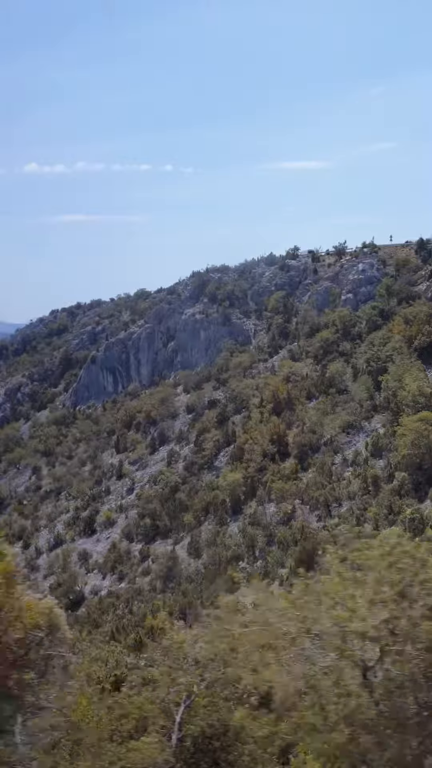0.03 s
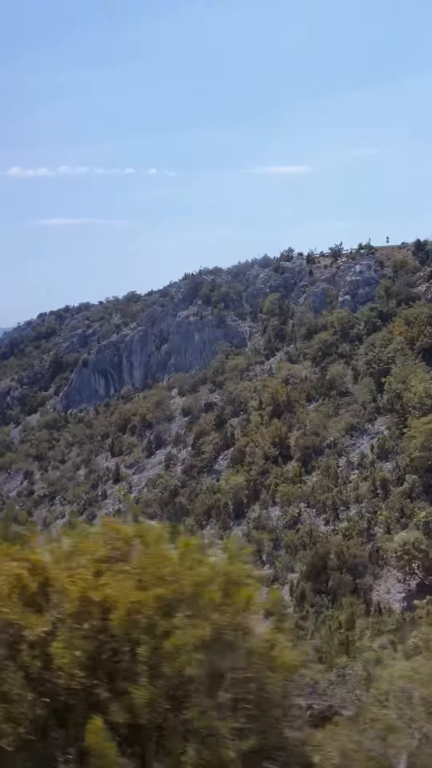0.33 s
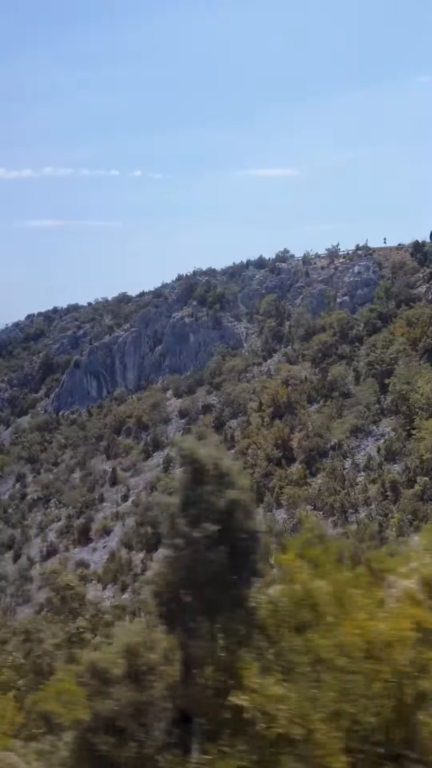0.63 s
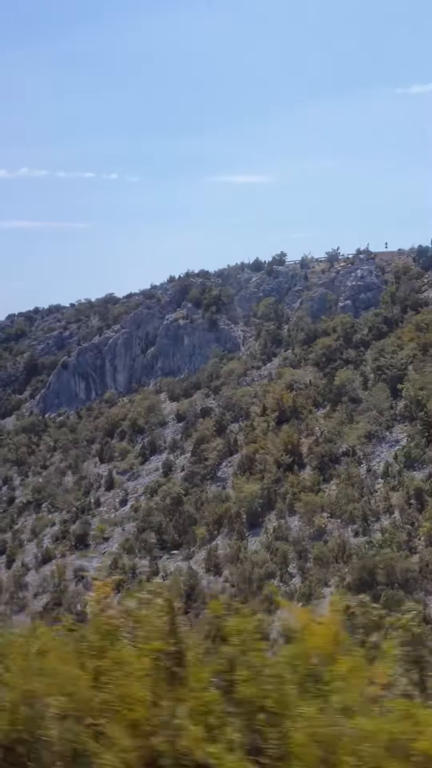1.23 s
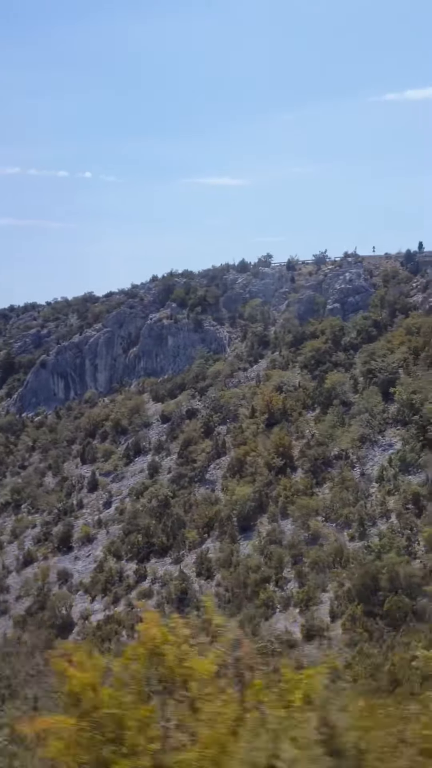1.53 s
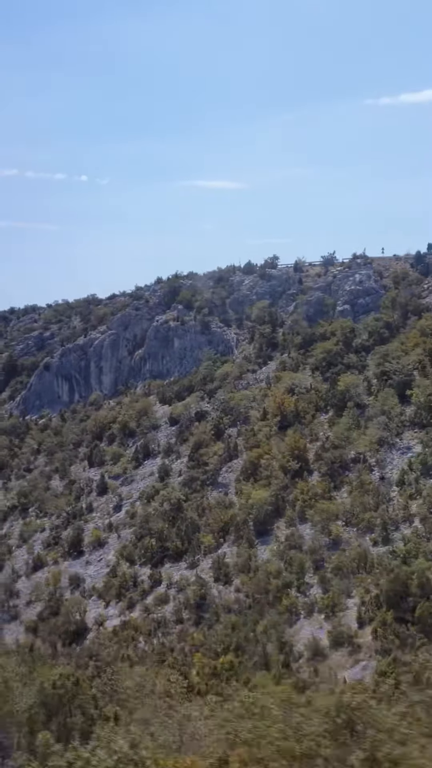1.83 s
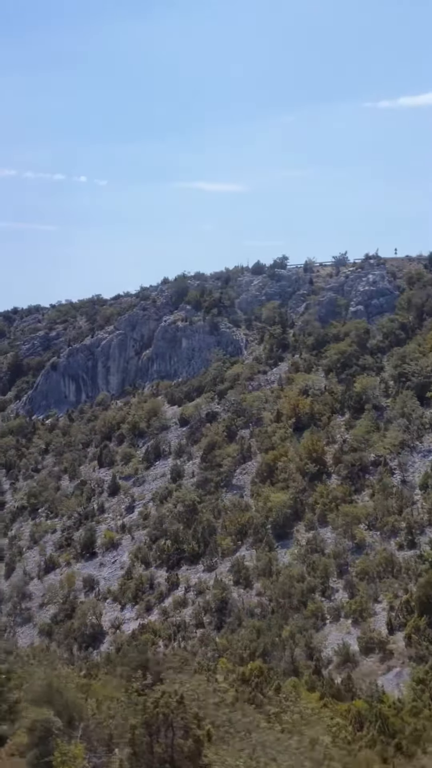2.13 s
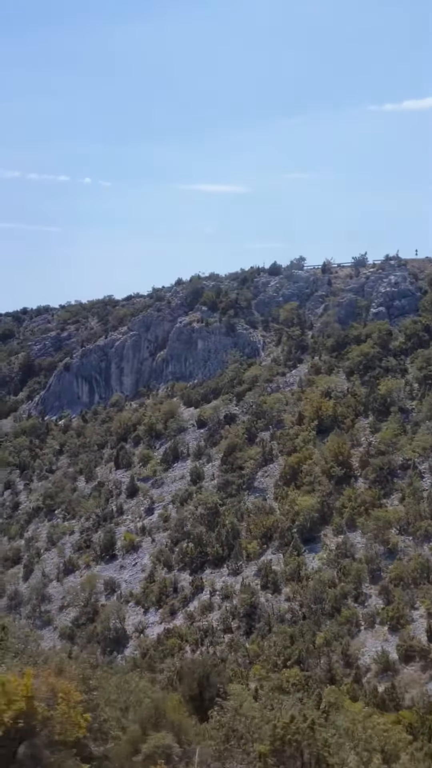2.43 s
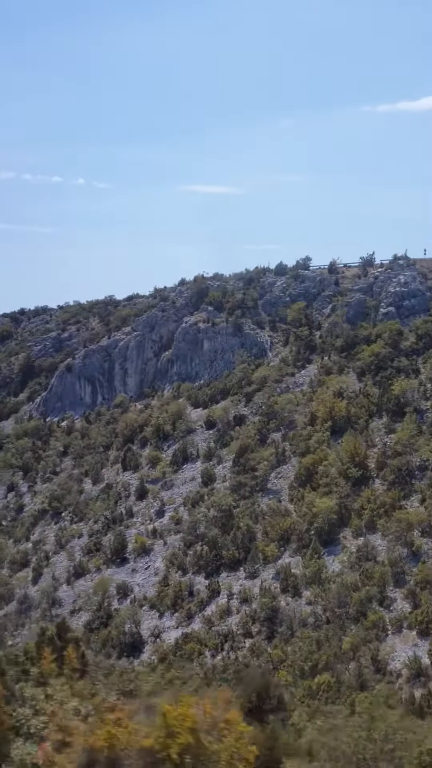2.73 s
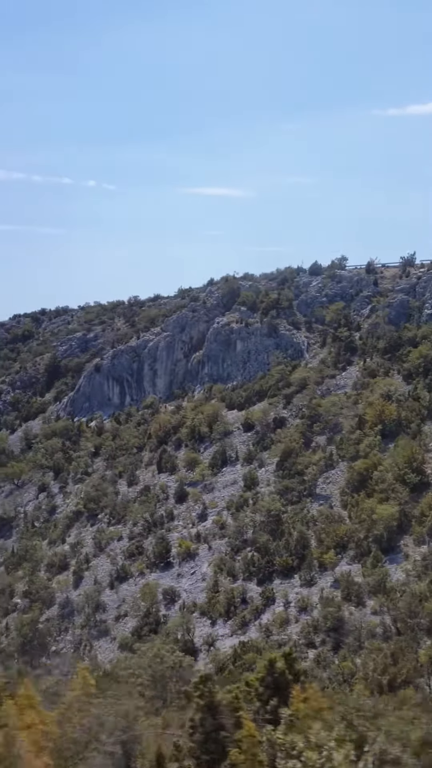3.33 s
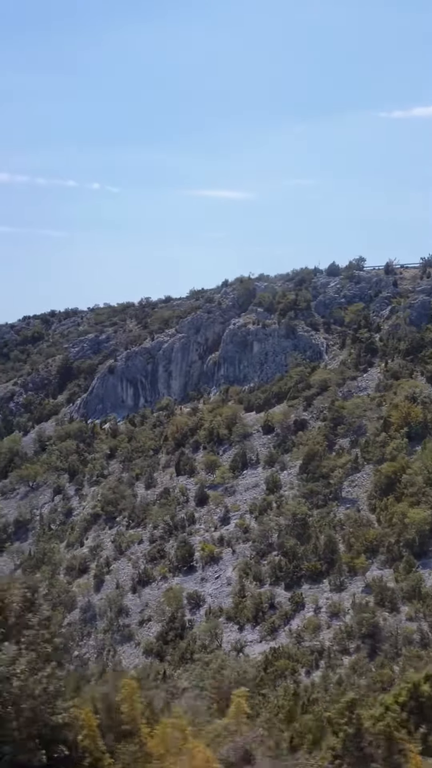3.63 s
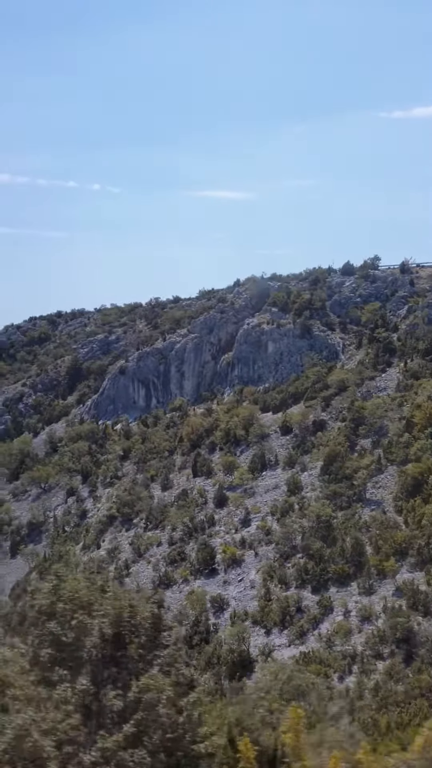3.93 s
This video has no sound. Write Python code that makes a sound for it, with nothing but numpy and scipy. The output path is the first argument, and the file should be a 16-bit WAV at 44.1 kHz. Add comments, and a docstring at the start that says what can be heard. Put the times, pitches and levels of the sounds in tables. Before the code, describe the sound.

Low road rumble and engine drone fill the cabin of a travelling bus, with the microphone inside. A vent hisses faintly and the body gives a few soft knocks, while the engine grows slightly stronger toward the end.

```python
"""Inside a moving bus

The road forces the tyres and body into broadband roar and rumble; bumps excite soft jolts and knocks.
The engine hums at multiples of its firing rate, and a thin drivetrain whine climbs slowly.
Air hisses from a vent and whistles in narrow resonances; once there is a tiny high squeak and swish."""
import sys
import numpy as np
from scipy.fft import rfft, irfft, next_fast_len
from scipy.io import wavfile
from scipy.ndimage import map_coordinates

SR = 44100
rng = np.random.default_rng(int(sys.argv[2]) if len(sys.argv) > 2 else 0)


def store_pcm(level_fs):
    """Save levels as 16-bit WAV."""
    pcm = np.round(np.clip(level_fs, -1, 1) * 32767).astype(np.int16)
    wavfile.write(sys.argv[1], SR, np.atleast_2d(pcm).T)


N = 176400

# Noise spectra of body, tyres, roadside reflection, engine, vent and swish: frequency_hz, relative_db
RUMBLE_SPECTRUM = [(12, -38), (20, -17), (33, -17.5), (56, -4.5), (74, -2), (100, -2), (150, -1),
                   (200, -1.5), (259, -6.5), (300, -11.5), (350, -14), (450, -16), (540, -26.5),
                   (900, -58.5)]
ROAR_SPECTRUM = [(150, -67), (350, -11.5), (480, -5), (590, -2.5), (770, -3.5), (1000, -8), (1300, -11),
                 (3000, -39)]
REFLECTION_SPECTRUM = [(250, -8), (550, -3), (950, 2.5), (1400, -11), (3000, -11.5), (6000, -20),
                       (9000, -45)]
DRONE_SPECTRUM = [(220, -35), (310, -1), (355, 8.5), (400, -4.5), (470, -4), (620, -13), (760, -7),
                  (1000, -45)]
AIR_SPECTRUM = [(400, -32), (900, -5), (1250, -8.5), (1400, 2.5), (1580, -0.5), (1750, -7.5), (1980, -5),
                (2140, -2.5), (2400, -0.5), (2600, -5), (3100, -11.5), (3550, -6), (4200, -6), (4850, -8.5),
                (5300, -8.5), (6100, -8), (6700, -11), (7600, -20), (9300, -24.5), (11200, -23.5),
                (13500, -29.5), (15600, -44)]
SWISH_SPECTRUM = [(7000, -40), (9000, -7), (10500, 0), (12500, -1), (13500, -3), (15500, -6)]
# Likeness of the left and right signals: frequency_hz, correlation
RUMBLE_CORRELATION = [(30, 0.92), (160, 1), (250, 0.94), (340, 0.75), (450, 0.61), (700, .2)]
AIR_CORRELATION = [(700, 0.13), (1200, 0.14), (1550, 0.61), (2100, 0.3), (2800, 0.077), (4100, 0.48),
                   (4800, 0.13), (6000, 0.59), (7000, 0.28), (8100, 0.72), (9500, .05)]
# Roughness of the road: time_s, gain_db
ROUGHNESS = [(0, 1.5), (.16, 0), (.28, 1.2), (.44, 0), (.58, 1), (.9, -1.8), (1.15, 0.1), (1.7, -0.7),
             (2.17, -0.9), (2.27, 0), (2.33, -3), (2.5, -1.3), (2.7, 0), (3.3, -2), (3.45, 0), (3.7, -0.5),
             (4, 0)]
# Deep shudder of the body: time_s, level_db
SHUDDER_LEVEL = [(0, -32), (.55, -31), (.92, -62), (1.12, -22.5), (1.3, -43), (1.45, -29.5), (1.9, -36),
                 (2.1, -33), (2.42, -36), (3.2, -35), (4, -46)]
# Swells of body resonances: centre_s, level_db, pitch_hz, half_width_s
BODY_JOLTS = [(0.088, -19, 125, 0.022), (0.196, -20.5, 88, 0.039), (0.246, -23.5, 245, 0.042),
              (0.56, -20, 77.9, 0.049), (0.756, -23, 75, 0.098), (1.162, -25.5, 82, 0.12),
              (1.65, -26, 75, 0.037), (2.024, -24, 72, .045), (2.154, -24, 245, 0.029),
              (2.213, -16.5, 164.8, 0.02), (2.825, -21, 78.24, 0.026), (3.282, -25.5, 140, 0.079),
              (3.67, -27.5, 210, 0.14)]
# Impacts on the body: start_s, level_db, pitch_hz
BODY_KNOCKS = [(0.304, -9.5, 115), (.572, -12, 205), (3.093, -10, 229), (3.111, -8.5, 151),
               (3.195, -8.5, 170)]
# Harmonics of the firing rate: multiple, level_db
ENGINE_ORDERS = [(2, -43), (3, -38.5), (4, -38), (5, -47), (6, -51)]
# Swell of the engine's hum and rough drone under load: time_s, gain_db
HUM_GAIN = [(0, -5.5), (1.3, -8.5), (2.5, -7), (2.8, -4), (3.25, 0.5), (3.7, -2), (4, 1)]
DRONE_GAIN = [(0, -5.5), (1.3, -11), (2.5, -8.5), (2.73, 0), (2.98, -2), (3.23, 4.5), (3.45, -2), (4, 1.5)]
# Climb of the drivetrain whine: time_s, pitch_hz
WHINE_PITCH = [(0, 531), (.25, 535.5), (.5, 544.5), (.8, 551), (1.3, 559), (1.55, 567), (2, 577),
               (2.35, 578), (2.8, 592), (3.3, 597), (4, 609)]
# Strength of the whine: time_s, level_db
WHINE_STRENGTH = [(0, -48.5), (.9, -52), (1.5, -47), (2.1, -50.5), (2.8, -50), (3.3, -56), (3.7, -46),
                  (4, -52)]
# Balance of the vent noise: frequency_hz, left_minus_right_db
AIR_BALANCE = [(600, -7), (1200, -6.5), (1550, 4), (2000, -6), (2400, -2.5), (2700, -5.5), (3700, -2.5),
               (4800, -1.5), (5250, -1.5), (5900, 0.5), (6700, 4.5), (7800, 4.5), (9500, 6.5),
               (15000, 15.5)]
# Resonances of the duct: centre_hz, half_width_hz, level_db
DUCT_MODES = [(1560, 105, -48), (2140, 39, -55)]
# Swell of the whole vent and of its duct resonances: time_s, gain_db
VENT_GAIN = [(0, 0), (.5, -0.6), (.9, -0.4), (1.6, -0.5), (3, 0.27), (4, -0.1)]
DUCT_GAIN = [(0, 1), (.9, -2), (1.35, 4.5), (2.2, 1), (3.05, 2.5), (3.6, -1.5), (4, 2)]

RUMBLE_DB, ROAR_DB, SHUDDER_HZ = -22, -38, 43.5
FIRING_HZ, DRONE_DB = 86.8, -37
BOOM_HZ, BOOM_DB = 74.03, -32.5
AIR_DB, AIR_LEAD_S = -36.5, 0.0004933
WHISTLE_HZ, WHISTLE_DB = 2467, -48.5


def road():
    """Forced vibration: body rumble and tyre roar follow the road's roughness, over a deep shudder."""
    rough_db = curve(ROUGHNESS)
    rumble = noise(RUMBLE_SPECTRUM, RUMBLE_CORRELATION, lead_s=0.00013)
    rumble *= amp(RUMBLE_DB + rough_db + 0.2 * wobble(12))
    rumble = pan_bands(rumble, [(70, 1), (170, 0.88), (250, -0.68), (350, -.9), (450, 0.26)])
    roar = noise(ROAR_SPECTRUM, [(400, 0.37), (900, 0.44)], lead_s=0.00037)
    roar *= amp(ROAR_DB + 0.24 * rough_db + .6 * wobble(7.57))
    shudder = tone(SHUDDER_HZ * (1 + 0.1 * wobble(21.34)), flutter_db=3, rate_hz=31)
    shudder *= amp(curve(SHUDDER_LEVEL))
    return rumble + roar * pan(db=2) + shudder * pan(db=-1)


def jolts():
    """Resonance: each unevenness of the road briefly swells one low mode of the body."""
    t, out = np.arange(N) / SR, np.zeros(N)
    for centre_s, db, hz, half_width_s in BODY_JOLTS:
        swell = amp(db) * np.exp(-((t - centre_s) / half_width_s) ** 2)
        out += swell * tone(hz * (1 + 0.0807 * wobble(40)), flutter_db=3, rate_hz=30)
    return out * pan(db=.9)


def knocks(rise_s=0.0029, t60_s=0.051):
    """Damped free vibration: after a sharp bump the body rings for a few cycles."""
    out = np.zeros(N)
    for start_s, db, hz in BODY_KNOCKS:
        t = time_since(start_s)
        envelope = amp(db - 60 * t / t60_s) * np.minimum(t / rise_s, 1)
        out += envelope * np.sin(2 * np.pi * hz * t)
    return out * pan(db=2)


def engine():
    """Periodic firing gives a harmonic hum, joined by rough drone, cabin boom and drivetrain whine."""
    firing_hz = FIRING_HZ * (1 + 0.0047 * wobble(7.01))
    hum = sum(amp(db) * tone(k * firing_hz, flutter_db=2, rate_hz=9.9) for k, db in ENGINE_ORDERS)
    drone = noise(DRONE_SPECTRUM, [(300, 0.56), (450, 0.98), (600, 0.076)], lead_s=0.00014)
    drone *= amp(DRONE_DB + curve(DRONE_GAIN))
    boom = amp(BOOM_DB) * tone(BOOM_HZ * (1 + 0.027 * wobble(12)), flutter_db=2, rate_hz=7.6)
    whine = tone(curve(WHINE_PITCH) * (1 + 0.00092 * wobble(15)), flutter_db=2, rate_hz=9)
    whine *= amp(curve(WHINE_STRENGTH))
    return hum * amp(curve(HUM_GAIN)) + drone + boom + whine * pan(db=7.5)


def vent():
    """Flow noise: air hisses, whirrs in the duct's resonances and whistles in one very narrow band."""
    hiss = noise(AIR_SPECTRUM, AIR_CORRELATION, AIR_LEAD_S)
    hiss = amp(AIR_DB) * unit(pan_bands(hiss, AIR_BALANCE))
    whirr = sum(amp(db) * resonance(hz, width, correlation=0.61) for hz, width, db in DUCT_MODES)
    whirr = amp(curve(DUCT_GAIN)) * pan_bands(whirr, AIR_BALANCE)
    whistle = amp(WHISTLE_DB) * resonance(WHISTLE_HZ, half_width_hz=14, correlation=0.91)
    return amp(curve(VENT_GAIN) + 0.31 * wobble(12)) * (hiss + whirr + whistle)


def roadside_reflection(centre_s=0.503, half_width_s=0.12, level_db=-36.5):
    """Reflection: tyre noise thrown back from the roadside swells and fades once."""
    t = np.arange(N) / SR
    swell = amp(level_db) * np.exp(-((t - centre_s) / half_width_s) ** 2)
    return swell * noise(REFLECTION_SPECTRUM, [(400, .6), (900, .2)])


def swish(start_s=1.425, level_db=-46.5, rise_s=0.0063, hold_s=0.018, fall_s=0.017):
    """Amplitude modulation of high noise: one grainy swish over a faint, flickering rustle."""
    t = time_since(start_s)
    envelope = np.minimum(t / rise_s, 1) * np.exp(-np.maximum(t - rise_s - hold_s, 0) / fall_s)
    rustle = amp(-66 + 4 * wobble(28))
    hiss = noise(SWISH_SPECTRUM, [(10000, .05)])
    burst = amp(level_db + wobble(200)) * envelope
    return hiss * (burst + rustle) * pan(db=8)


def squeak(start_s=1.429, level_db=-45.5, rise_s=0.0015, glide_s=0.007, fall_s=0.016):
    """Fast random modulation roughens a tiny tone that sags in pitch as it decays."""
    t = time_since(start_s)
    start_hz, end_hz = 12000, 10880
    hz = end_hz + (start_hz - end_hz) * np.exp(-t / glide_s)
    envelope = amp(level_db) * np.minimum(t / rise_s, 1) * np.exp(-t / fall_s)
    return envelope * tone(hz * (1 + .022 * wobble(1500)), flutter_db=5, rate_hz=500) * pan(db=6.5)


def noise(spectrum, correlation, lead_s=0):
    """Partly coherent stereo noise of rms 1; correlation holds (frequency_hz, correlation) points."""
    def mid_side_gains(hz):
        """The mid and side shares of the power set the correlation."""
        angle = np.arccos(np.clip(along(correlation, hz), -.999, .999)) / 2
        return amp(along(spectrum, hz)) * [np.cos(angle), np.sin(angle)]

    mid, side = filtered(rng.standard_normal((2, N)), mid_side_gains)
    stereo = np.array([mid + side, mid - side])
    advance_s = np.array([[.5], [-.5]]) * lead_s  # the shared part reaches the left first
    return unit(filtered(stereo, lambda hz: np.exp(2j * np.pi * hz * advance_s)))


def resonance(centre_hz, half_width_hz, correlation):
    """A resonance selects one narrow band of white noise; stereo, rms 1."""
    white = noise([(1000, 0)], [(1000, correlation)], AIR_LEAD_S)
    return unit(filtered(white, lambda hz: 1 / (1 + ((hz - centre_hz) / half_width_hz) ** 2)))


def tone(hz, flutter_db, rate_hz):
    """Phase is the integral of frequency: a sine of rms 1 with unsteady level."""
    cycles = np.cumsum(hz) / SR + rng.random()
    return unit(np.sin(2 * np.pi * cycles) * amp(flutter_db * wobble(rate_hz)))


def wobble(rate_hz):
    """A smooth curve through random values drawn at rate_hz."""
    knots = rng.standard_normal(int(N * rate_hz / SR) + 4)
    return map_coordinates(knots, [np.arange(N) * rate_hz / SR])


def filtered(x, response):
    """Linear filtering: the spectrum of x times a frequency response."""
    size = next_fast_len(N + SR // 2)
    return irfft(rfft(x, size) * response(np.fft.rfftfreq(size, 1 / SR)), size)[..., :N]


def pan(db):
    """Left and right gains for a level difference."""
    return amp(np.array([[.5], [-.5]]) * db)


def pan_bands(x, balance):
    """Pan each frequency by (frequency_hz, left_minus_right_db) points."""
    return filtered(x, lambda hz: pan(along(balance, hz)))


def along(points, hz):
    """Interpolate (frequency_hz, value) points on a log axis."""
    frequencies, values = np.transpose(points)
    return np.interp(np.log(hz + 1), np.log(frequencies + 1), values)


def curve(points):
    """Interpolate (time_s, value) points at every sample."""
    return np.interp(np.arange(N) / SR, *np.transpose(points))


def time_since(start_s):
    """Seconds since an onset, zero before it."""
    return np.maximum(np.arange(N) / SR - start_s, 0)


def amp(db):
    """Decibels to gain."""
    return 10 ** (np.asarray(db) / 20)


def unit(x):
    """Scale to rms 1."""
    return x / np.sqrt(np.mean(x ** 2) + 1e-20)


def scene():
    """Superposition: the pressures of all sources add in the cabin."""
    return road() + roadside_reflection() + jolts() + knocks() + engine() + vent() + swish() + squeak()


def record(dry):
    """Band limiting: an ideal low-pass filter removes the highest treble."""
    return filtered(dry, lambda hz: hz < 15750)


dry = scene()
out = record(dry)
store_pcm(out)
```